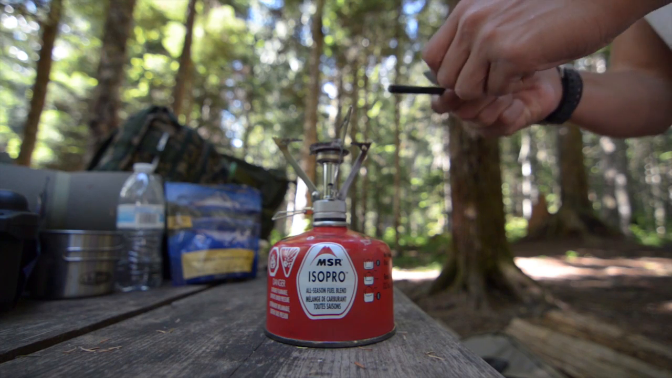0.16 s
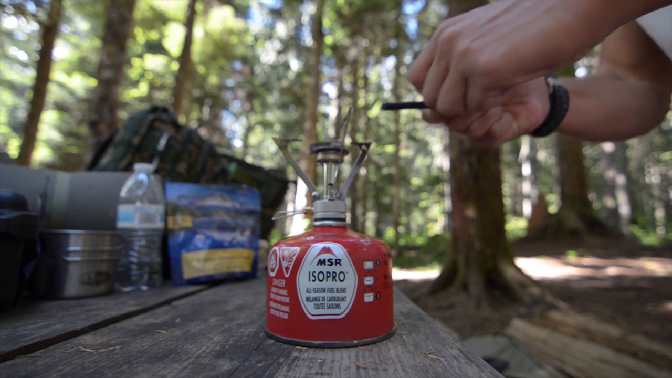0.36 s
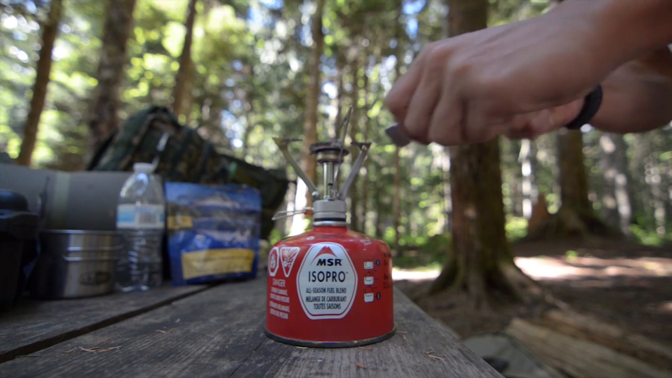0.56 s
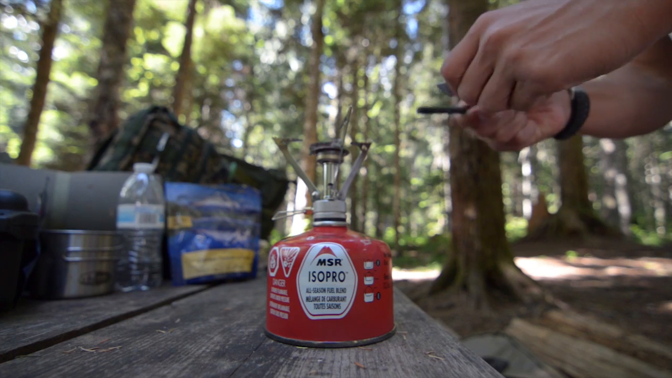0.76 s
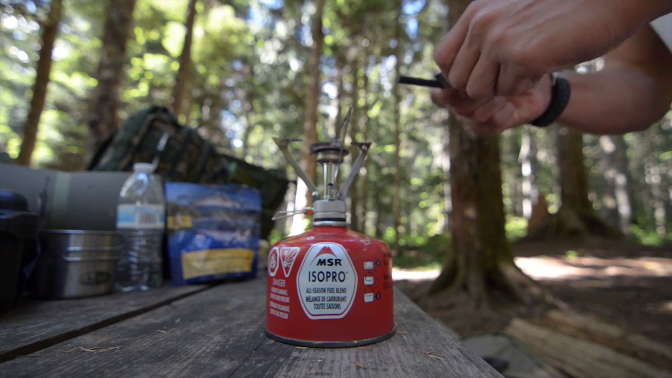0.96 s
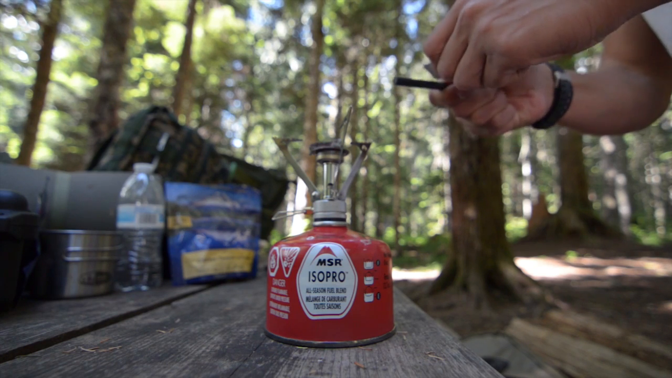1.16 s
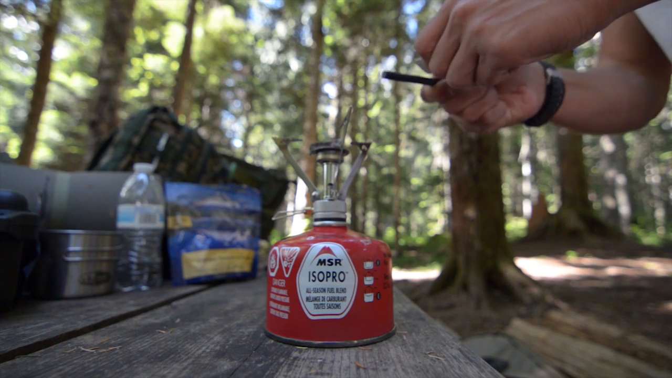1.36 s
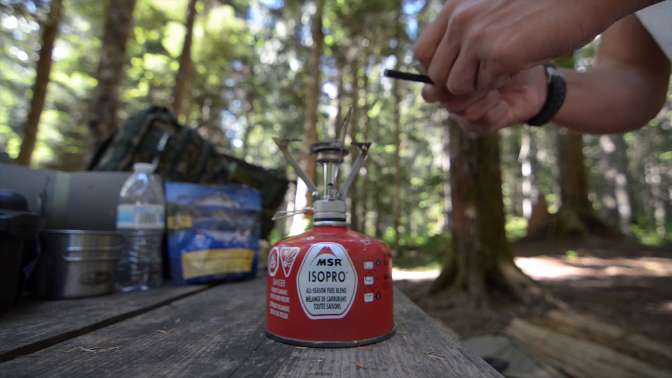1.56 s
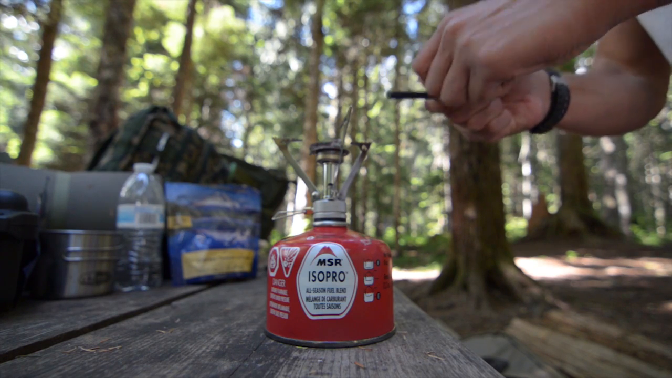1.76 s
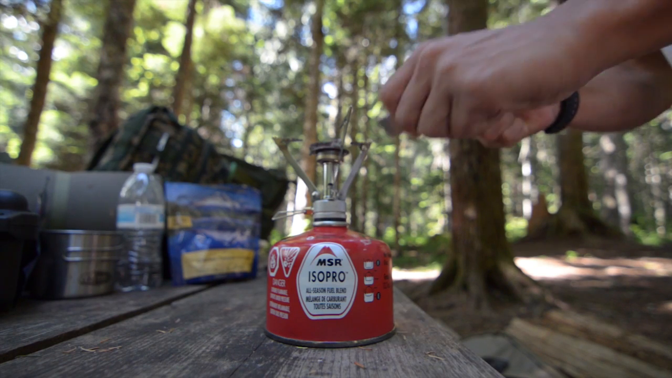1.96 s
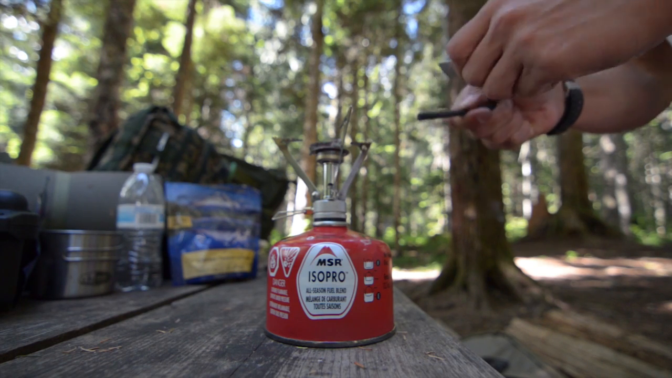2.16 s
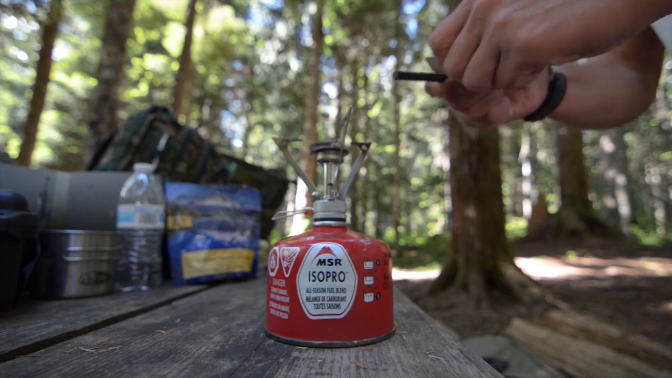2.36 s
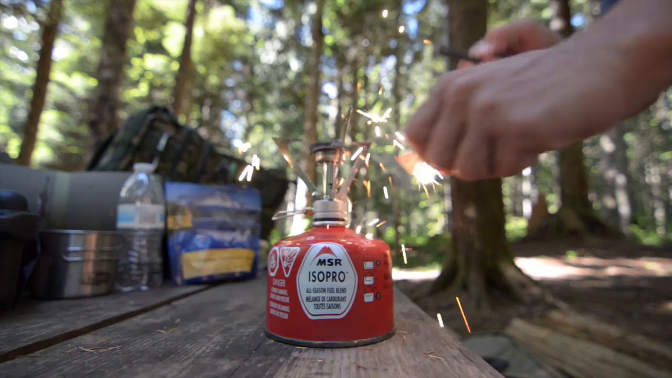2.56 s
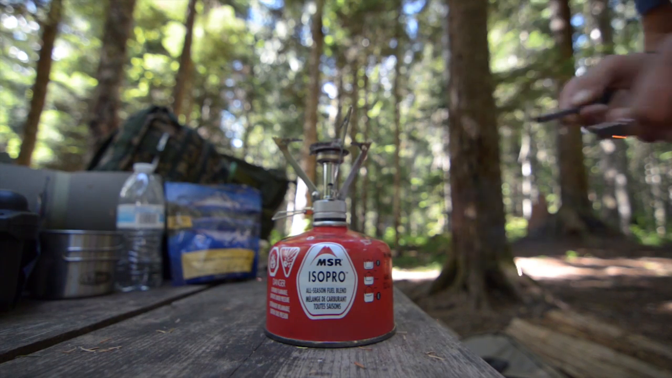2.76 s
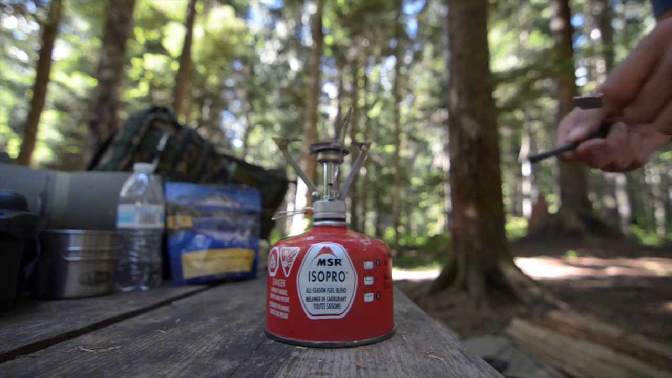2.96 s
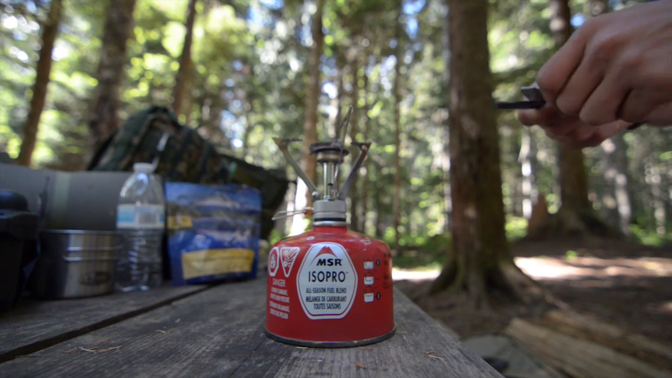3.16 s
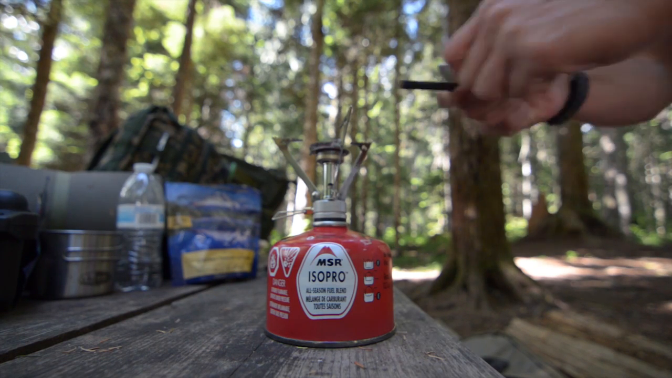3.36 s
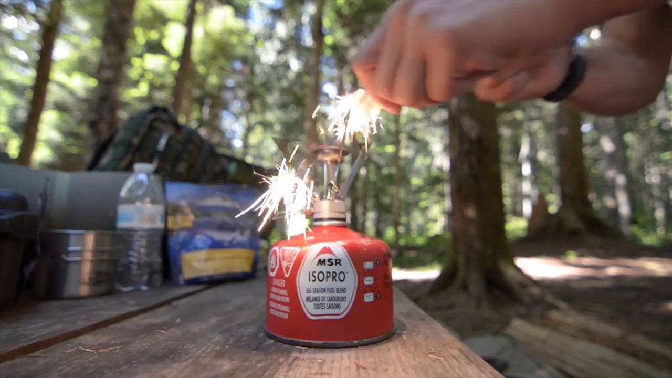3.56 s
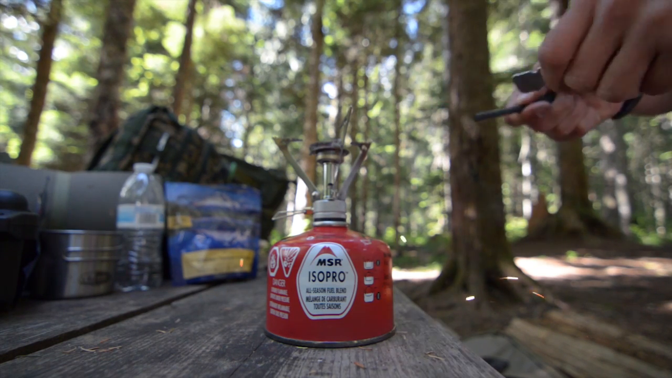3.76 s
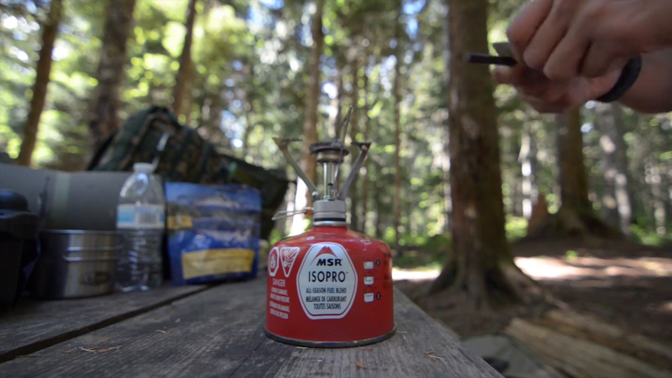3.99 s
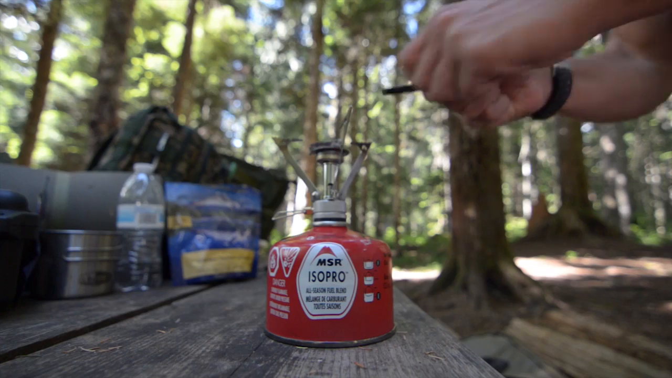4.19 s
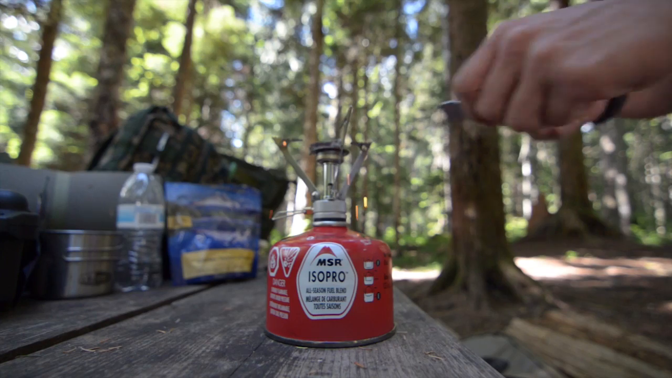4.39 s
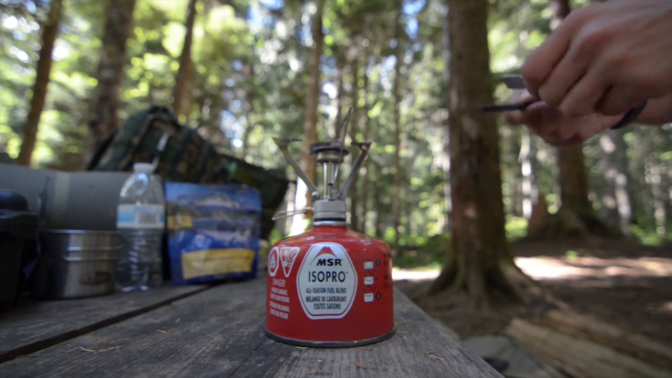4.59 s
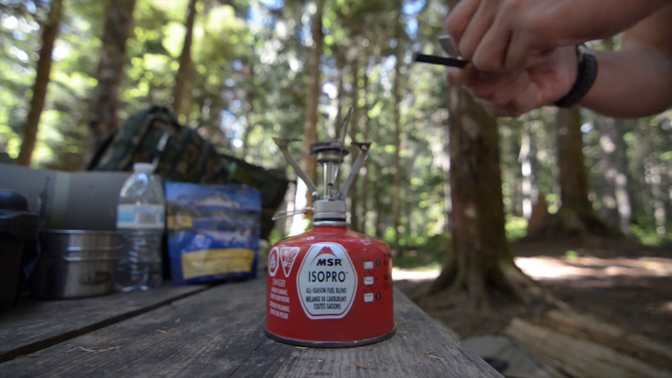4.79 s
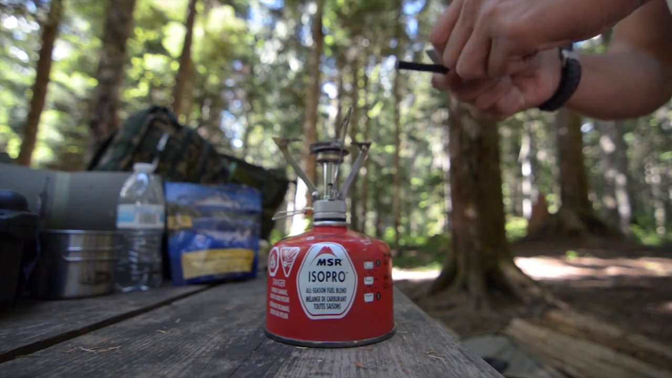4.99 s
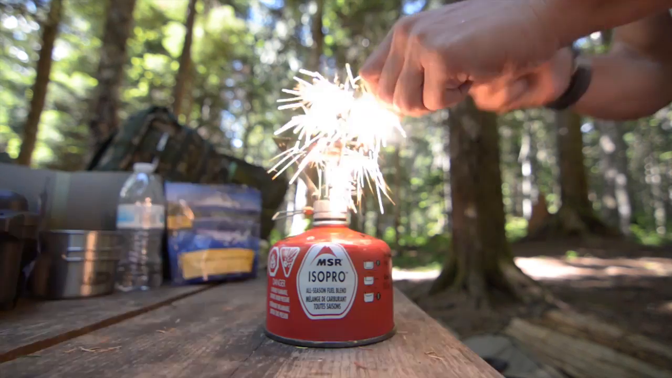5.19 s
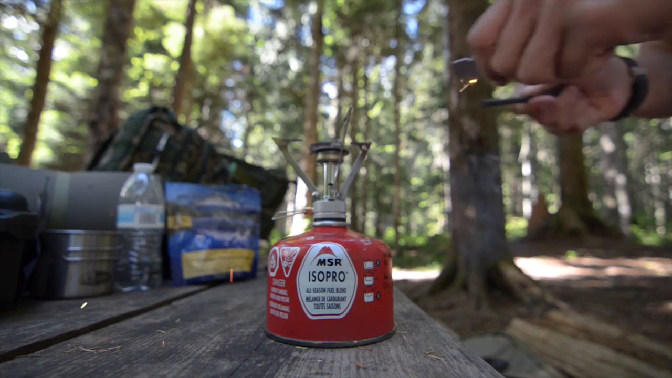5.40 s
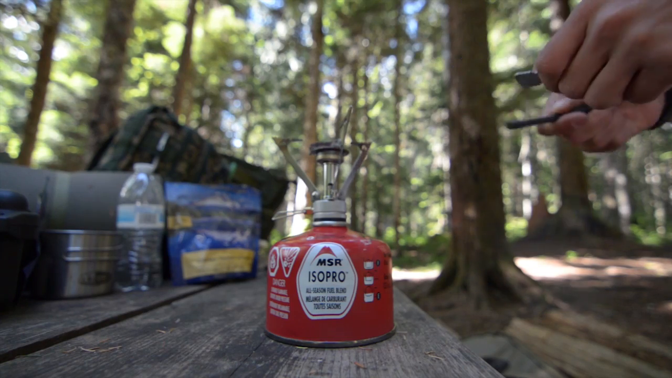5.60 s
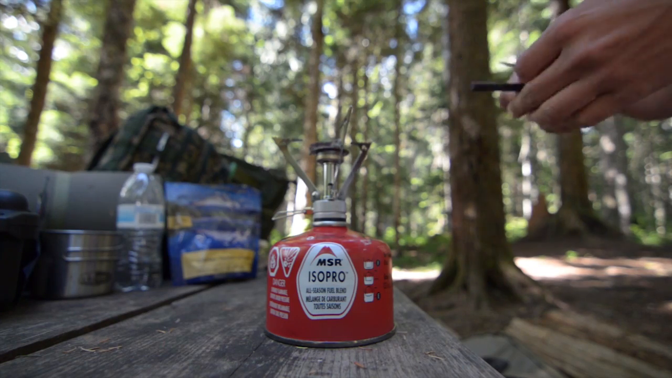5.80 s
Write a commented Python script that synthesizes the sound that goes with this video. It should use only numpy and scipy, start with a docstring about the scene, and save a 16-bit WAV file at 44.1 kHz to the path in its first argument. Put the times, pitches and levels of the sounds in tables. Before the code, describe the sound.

A nearly six-second close outdoor take of a steel striker on a fire-starting rod. Brief bright rubs open it, with a faint click at 0.15. At about 0.46 a short rasp ends in a hard double clack at 0.5, with barely any crackle. Dull rubs and a light clack follow around 0.86 to 1.04. A weaker scrape comes at 1.85, with a sharp tick and a small fizz at 1.93. After a clack at 2.33, the stroke at 2.48 erupts at 2.55 into loud dense crackle and pops, spluttering until 2.7. Further gritty strokes at 3.51 and 4.25 snap and flare, the former trailing tiny pops to 3.73. The last, at 5.2, bursts loudly at 5.26, then leaves small bright ticks until 5.45. A soft, steady hush of trees lies beneath, with low wind bumps, strongest around 5 seconds. The sound is dry, with only very faint scatter from trunks.

```python
"""A steel striker is drawn along a ferrocerium rod six times, over a camping stove in a forest.
Each stroke is scraping grit that rings the steel; the slips and landings are clacks of chatter and damped modes.
The shavings burn as clouds of random impulses, the largest popping singly; light rubs and ticks fill the gaps.
Filtered noise makes the hush of the trees and the gusts buffeting the microphone."""
import sys
import numpy as np
from scipy import signal
from scipy.fft import rfft, irfft, next_fast_len
from scipy.io import wavfile
from scipy.ndimage import map_coordinates

SR = 44100
rng = np.random.default_rng(int(sys.argv[2]) if len(sys.argv) > 2 else 0)


def to_wav(sig):
    """Store sig (one row per channel, or 1-D mono) as 16-bit WAV at the path in sys.argv[1].

    Samples outside -1..1 are clipped; the rate is SR.
    """
    pcm = np.clip(np.atleast_2d(sig), -1, 1) * 32767
    pcm = np.round(pcm).astype(np.int16)
    wavfile.write(sys.argv[1], SR, pcm.T)  # frames by channels


N = 257544  # length in samples


def amp(db):
    """Decibels to gain."""
    return 10 ** (np.asarray(db) / 20)


def unit(x):
    """Scale to rms 1."""
    return x / np.sqrt(np.mean(x ** 2) + 1e-20)


def gain(points, hz):
    """Gain of (Hz, dB) points on a log frequency axis."""
    f, db = np.transpose(points)
    return amp(np.interp(np.log(hz + 1), np.log(f), db))


def curve(rows):
    """One value per sample from (s, value) rows."""
    s, value = np.transpose(rows)
    return np.interp(np.arange(N) / SR, s, value)


def wobble(rate):
    """A smooth random curve, rate knots a second."""
    knots = rng.standard_normal(int(N * rate / SR) + 4)
    return map_coordinates(knots, [np.arange(N) * rate / SR])


def resonance(f, hz, width):
    """Complex response of one damped mode."""
    return 1j * f * width / (hz * hz - f * f + 1j * f * width)


def coloured(x, magnitude):
    """Causal (minimum-phase) filter with the given gain at each frequency."""
    size = 4096
    log_gain = np.log(np.maximum(magnitude(np.fft.rfftfreq(size, 1 / SR)), 1e-6))
    cepstrum = irfft(log_gain)
    cepstrum[1:size // 2] *= 2
    cepstrum[size // 2 + 1:] = 0
    impulse_response = irfft(np.exp(rfft(cepstrum)))
    return signal.fftconvolve(x, impulse_response)[:len(x)]


def grains(rate, spread_db):
    """Tiny random impulses of uneven size, rate a second, rms 1."""
    chance, size, sign = rng.random(N), rng.standard_normal(N), rng.choice([-1, 1], N)
    return unit((chance < rate / SR) * sign * amp(spread_db * np.clip(size, -2, 2)))


def add(track, s, sound):
    """Mix a sound into the track at time s."""
    start = max(round(s * SR), 0)
    part = track[start:start + len(sound)]
    part += sound[:len(part)]


def bells(rows):
    """Bell-shaped swells, added in power, from (s, length s, dB) rows."""
    t = np.arange(N) / SR
    return np.sqrt(sum(amp(db) ** 2 * np.exp(-(2 * (t - s) / length) ** 2) for s, length, db in rows))


def sliding(s, length, knots_s, levels_db, rise, fall):
    """Envelope of one sliding contact, its level passing through the given knots."""
    t = np.arange(N) / SR - s
    gate = np.clip(t / rise, 0, 1) * np.exp(-np.maximum(t - length, 0) / fall)
    return gate * amp(np.interp(t, knots_s, levels_db))


def snaps(rows, spectrum, tail, t60):
    """Sharp little impulses with a short splutter, peak dB for each row."""
    out, t = np.zeros(N), np.arange(SR // 30) / SR
    for s, db in rows:
        splutter = tail * rng.standard_normal(len(t)) * amp(-60 * t / t60)
        snap = coloured((t == 0) + splutter, spectrum)
        add(out, s, amp(db) * snap / abs(snap).max())
    return out


# Gusts reaching the microphone. Each row: height of the gust in seconds, length in seconds, level in dB.
GUSTS = [(0.5, 0.16, -46), (0.817, 0.045, -44.5), (1.124, 0.1, -45.5), (1.263, 0.048, -37.5),
         (1.562, 0.2, -42), (1.803, 0.055, -40), (2.188, 0.04, -48.5), (2.563, 0.22, -45.5),
         (2.84, 0.09, -45.5), (3.138, 0.074, -43.5), (4.041, 0.056, -42.5), (4.495, 0.057, -43.5),
         (4.653, 0.08, -44.5), (4.97, 0.21, -35), (5.188, 0.11, -37.5), (5.415, 0.24, -40.5)]
# The light air between gusts. Each row: time in seconds, level in dB.
LIGHT_AIR = [(0, -52.5), (1.9, -57.5), (3.4, -60.5), (4.2, -63.5), (5.84, -59)]
DRIFT_SWING_DB, DRIFT_RATE = 3.5, 10  # typical random swing, knots a second


def wind_strength():
    """Light air wanders; the gusts swell and sink on top of it, added in power."""
    light_air = amp(curve(LIGHT_AIR) + DRIFT_SWING_DB * wobble(DRIFT_RATE))
    return np.hypot(bells(GUSTS), light_air)


# Hush of the trees. Each row: frequency in Hz, relative density in dB per Hz.
FOREST_SPECTRUM = [(60, -7.5), (400, 0), (800, 1.5), (1800, -3), (2600, -5.5), (3400, -3.5), (4200, -1),
                   (5000, -7), (7500, -9.5), (10500, -21), (12000, -29.5), (16000, -34)]
# Rumble of air on the microphone. Each row: frequency in Hz, relative density in dB per Hz.
RUMBLE_SPECTRUM = [(20, -7), (45, 3), (80, 2.5), (130, -0.5), (200, -9.5), (320, -18), (700, -42),
                   (2000, -93.5)]
# Single eddies hitting the microphone. Each row: start in seconds, peak in dB.
EDDIES = [(4.987, -26), (5.024, -27.5), (5.188, -21.5), (5.347, -25.5)]


def breeze():
    """An almost steady hush in the trees, lumpy turbulence on the microphone and a few single eddies."""
    trees = unit(coloured(rng.standard_normal(N), lambda f: gain(FOREST_SPECTRUM, f)))
    rumble = coloured(rng.standard_normal(N), lambda f: gain(RUMBLE_SPECTRUM, f))
    air = unit(rumble * amp(2.9 * wobble(25)))
    out = amp(-49.0 + 0.37 * wobble(4.09)) * trees + wind_strength() * air
    u = np.arange(SR // 20) / SR / 0.0014
    for s, db in EDDIES:
        eddy = u * (2 - u) * np.exp(-u)  # one push and its suction
        add(out, s, amp(db) * eddy / eddy.max())
    return out


# Light sliding of steel on the rod. Each row: start in seconds, length in seconds, level in dB,
# brightness in dB (3 dB is taken off it when played).
RUBS = [(0, 0.037, -39, 15.5), (0.053, 0.016, -42, 9), (0.886, 0.034, -48.5, 1), (0.948, 0.03, -41.5, 0),
        (1.023, 0.017, -38.5, -4), (3.189, 0.016, -42.5, -3.5), (3.494, 0.013, -43.5, 1),
        (4.232, 0.0082, -40, 6), (5.05, 0.008, -42, 8), (5.383, 0.019, -42, 0)]
# Colour of bare steel contact, for rubs and clacks. Each row: frequency in Hz, relative density in dB per Hz.
CRACK_SPECTRUM = [(100, -29), (600, -8.5), (1300, -2), (3000, 4), (5000, 5.5), (8000, 3.5), (10500, -4.5),
                  (12500, -7), (16000, -8)]
# Treble shaping of rubs, clacks and rasp. Each row: frequency in Hz, gain in dB.
ROLL_OFF = [(9500, 3), (11500, -4.5), (13500, -7), (16000, -29)]


def rubs():
    """The striker slides lightly into place: dull on its flat, bright on its edge."""
    out = np.zeros(N)
    friction = grains(rate=12000, spread_db=3)
    for s, length, db, bright_db in RUBS:
        def tone(f):
            brightness = gain([(4500, 0), (7000, bright_db - 3.0)], f)
            ring = abs(1 + 1.9 * resonance(f, 1490, 350))
            return gain(CRACK_SPECTRUM, f) * gain(ROLL_OFF, f) * brightness * ring

        contact = sliding(s, length, [0], [db], rise=0.0013, fall=0.0039)
        out += contact * unit(coloured(friction, tone))
    return out


# Rod and striker, damped by the fingers. Each row: mode in Hz, relative level in dB, t60 in seconds
# (every clack detunes the modes and shifts their levels a little).
STEEL_MODES = [(3820, 2, 0.0091), (4630, 12, 0.0045), (6010, 1.5, 0.022), (7690, 16.5, 0.0068),
               (8950, 4.5, 0.0062)]
OVERTONE, OVERTONE_DB = 1.99, -13.5  # second bending mode of the rod, relative to the first


def clack(ring_hz, ring_db, treble_db):
    """One contact: a hard snap and chatter, brief steel modes and the low bending modes of the held rod."""
    t = np.arange(SR // 20) / SR
    chatter = rng.choice([-1., 1.], len(t)) * (amp(-60 * t / 0.016) + 0.92 * amp(-60 * t / 0.0026))
    crack = unit(coloured(chatter, lambda f: gain(CRACK_SPECTRUM, f)))
    modes = np.zeros(len(t))
    for hz, db, t60 in STEEL_MODES:
        decay = amp(db + rng.normal(0, 2.4) - 60 * t / t60)
        modes += decay * np.sin(2 * np.pi * hz * rng.normal(1, 0.02) * t)
    tilt = lambda f: gain([(4500, 0), (7000, treble_db)], f) * gain(ROLL_OFF, f)
    bright = unit(coloured(crack + amp(-7.5) * unit(modes), tilt))
    swing = np.sin(2 * np.pi * ring_hz * t) + amp(OVERTONE_DB) * np.sin(2 * np.pi * OVERTONE * ring_hz * t)
    bend = unit(swing * amp(-60 * t / 0.011) * (1 - np.exp(-t / 0.00089)))
    share = min(float(amp(ring_db - 0.5)), .9)
    sound = np.sqrt(1 - share ** 2) * bright + share * bend
    return sound / np.sqrt(np.sum(sound ** 2) / (SR / 200))  # as much energy as 5 ms at rms 1


# The striker slips off or lands on the rod. Each row: start in seconds, level in dB, ring in Hz,
# ring share in dB (0.5 dB is taken off, and the share is capped at 0.9), treble tilt in dB,
# thud of the hand in dB relative to the level.
CLACKS = [(0.153, -30.5, 1700, -35, -3, -28), (0.2964, -32, 1700, -15, -1.5, -22),
          (0.4585, -27, 1720, -9, -2, -8), (0.497, -10, 1970, -11, -0.2, -28),
          (0.521, -17, 1640, -0.1, 1.5, -20.5), (0.8575, -27, 1634, -6.5, -4.5, -27),
          (1.5977, -34, 1600, -11, -3.5, -20), (1.9232, -20, 1640, -4, -1.5, -19),
          (2.3284, -19.5, 1874, -5.5, 1, -42), (2.534, -6.5, 1650, -7, 8.5, -19),
          (3.5655, -11, 1640, -6, 7, -26), (4.0274, -30.5, 1570, -1.5, -3.5, -18),
          (4.3028, -9, 1560, -9.5, 4, -26), (5.2483, -9, 1585, -5.5, 6, -28)]
THUD_HZ, THUD_T60_S = 300, 0.017  # the fist around the rod takes the blow


def clacks():
    """Every hard contact of striker and rod, with its dull thud in the hand."""
    out, t = np.zeros(N), np.arange(SR // 20) / SR
    thud = np.sin(2 * np.pi * THUD_HZ * t) * amp(-60 * t / THUD_T60_S)
    thud /= np.sqrt(np.sum(thud ** 2) / (SR / 200))  # same energy as a clack
    for s, db, ring_hz, ring_db, treble_db, thud_db in CLACKS:
        add(out, s, amp(db) * (clack(ring_hz, ring_db, treble_db) + amp(thud_db) * thud))
    return out


# Strokes of the edge along the rod. Each row: first touch in seconds, draw until it slips in seconds,
# run-out after the slip in seconds, level in dB, first touch in dB relative to that level.
STROKES = [(0.461, 0.033, 0.03, -23, -11), (1.854, 0.06, 0.016, -23, -13.5), (2.482, 0.05, 0.11, -24, -11),
           (3.511, 0.045, 0.06, -22, -5.5), (4.25, 0.044, 0.014, -23, -7),
           (5.199, 0.058, 0.026, -20.5, -14.5)]
# Soft resonances of the rod and the hand around it. Each row: centre in Hz, width in Hz, level in dB.
GRIP = [(270, 190, -3.5), (970, 700, -10.5), (1665, 290, 7.5)]
GROAN_DB, GROAN_SWELL_DB = -39, 9  # full level, and how far below it the groan starts
GROAN_LEAD_S = 0.027  # head start on the first touch


def groan():
    """Pressed by the striker, the held rod starts to judder before the edge bites, and goes on until it slips."""
    levels = [GROAN_DB - GROAN_SWELL_DB, GROAN_DB]
    knots = [0, GROAN_LEAD_S + 0.006]
    pressure = sum(sliding(s - GROAN_LEAD_S, draw + GROAN_LEAD_S, knots, levels, rise=0.014, fall=0.0057)
                   for s, draw, *_ in STROKES)
    body = lambda f: sum(amp(db) * abs(resonance(f, hz, width)) ** 2 for hz, width, db in GRIP)
    judder = rng.standard_normal(N) * amp(2.4 * wobble(180))
    return pressure * unit(coloured(judder, body))


BITE_S = 0.022  # from first touch to full bite
# force relative to the stroke's level: once the edge has bitten, after the slip, at lift-off
BITE_DB, SLIP_DB, LIFT_DB = -1.5, -4.5, -11.5


def stroke_force(s, draw, run_out, touch_db):
    """The edge touches, bites, presses harder until it slips, and runs out along the rod."""
    knots = [0, BITE_S, draw, draw + 0.002, draw + 0.002 + run_out]
    levels = [touch_db, BITE_DB, 0, SLIP_DB, LIFT_DB]
    return sliding(s, draw + run_out, knots, levels, rise=0.002, fall=0.0028)


# Resonances driven by the scraping edge. Each row: centre in Hz, width in Hz, level in dB.
RASP_MODES = [(4680, 910, -8), (6700, 700, -5), (7640, 1000, 5.5), (8600, 650, -12)]
# Colour of the torn chips. Each row: frequency in Hz, relative density in dB per Hz.
GRIT_SPECTRUM = [(100, -24), (400, -20.5), (1200, -12.5), (2800, -34), (5000, -20), (9000, -27),
                 (16000, -21)]


def rasp():
    """The edge tears thousands of chips a second off the rod, and each one rings the steel."""
    force = sum(amp(db) * stroke_force(s, draw, run_out, touch_db) for s, draw, run_out, db, touch_db in STROKES)
    steel = lambda f: sum(abs(amp(db) * resonance(f, hz, width)) ** 2 for hz, width, db in RASP_MODES)
    body = lambda f: np.sqrt(gain(GRIT_SPECTRUM, f) ** 2 + steel(f)) * gain(ROLL_OFF, f)
    chips = grains(rate=20000, spread_db=3)
    catching = amp(2.8 * wobble(260))  # the edge catches and frees itself
    return force * unit(coloured(chips * catching, body))


CATCH_DB, BURN_DB = 29, 9  # a cloud swells by this much as it catches and sinks by this much as it burns
DIE_DB_PER_S = 858  # then it goes out


def flare(s, catch, burn):
    """Envelope of one cloud of shavings: it catches ever more slowly, burns down and goes out."""
    t = np.arange(N) / SR - s
    catching = CATCH_DB * np.clip(-t / catch, 0, 10) ** 2
    burning = BURN_DB * np.clip(t / burn, 0, 1)
    dying = DIE_DB_PER_S * np.maximum(t - burn, 0)
    return amp(-catching - burning - dying)


# Clouds of shavings catching fire. Each row: brightest moment in seconds, level in dB,
# time to catch in seconds, time to burn in seconds.
FLARES = [(0.518, -30.5, 0.014, 0.0061), (1.933, -25, 0.028, 0.017), (2.545, -14.5, 0.045, 0.045),
          (2.625, -28, 0.037, 0.036), (2.687, -32.5, 0.046, 0.004), (3.589, -17, 0.033, 0.062),
          (4.335, -19.5, 0.049, 0.021), (5.259, -14, 0.053, 0.031)]
# Colour of the burning shavings. Each row: frequency in Hz, relative density in dB per Hz.
FLARE_SPECTRUM = [(60, -25), (200, -6), (550, -4), (800, 2), (1000, 0.5), (1200, 3), (1500, -4.5),
                  (3800, -3), (5100, -0.5), (6300, -2.5), (8500, -4), (11000, -12), (15000, -29.5)]
# Single sparks and crumbs snapping. Each row: start in seconds, peak in dB.
POPS = [(2.576, -2), (2.6331, -11), (2.6608, -15), (2.7028, -18.5), (3.6542, -10), (3.672, -12),
        (3.689, -20.5), (3.7033, -18), (3.7181, -26), (3.7292, -20.5), (4.3597, -7.5), (5.2595, -2),
        (5.3362, -15), (5.3381, -13.5)]


def sparks():
    """Shavings ignite in a dense crackle; a few large ones burst singly."""
    fire = sum(amp(db) * flare(s, catch, burn) for s, db, catch, burn in FLARES)
    bursts = grains(rate=11000, spread_db=4) * amp(1.9 * wobble(200))
    blaze = fire * unit(coloured(bursts, lambda f: gain(FLARE_SPECTRUM, f)))
    pop_colour = lambda f: gain(FLARE_SPECTRUM, f) * gain([(1000, 1), (8000, -0.63)], f)
    return blaze + snaps(POPS, pop_colour, tail=0.13, t60=0.015)


# Faint hollow swells in the hush. Each row: height of the swell in seconds, length in seconds, level in dB.
SWELLS = [(0.75, 0.12, -52.5), (3.0, 0.1, -52.5)]
SWELL_HZ, SWELL_WIDTH_HZ = 610, 310


def swells():
    """Twice the hush briefly turns hollow: noise through one broad resonance."""
    hollow = lambda f: abs(resonance(f, SWELL_HZ, SWELL_WIDTH_HZ)) ** 2
    return bells(SWELLS) * unit(coloured(rng.standard_normal(N), hollow))


# Brief bright catches of the steel edge. Each row: start in seconds, peak in dB.
TICKS = [(1.875, -15.5), (2.7475, -30.5), (5.3877, -27), (5.3926, -33), (5.4014, -25.5), (5.4355, -38),
         (5.4514, -36)]


def ticks():
    """The edge barely touches the rod: mostly treble."""
    treble = lambda f: gain([(2000, -12), (5500, -12), (7500, 5), (10000, -4), (15000, -21)], f)
    return snaps(TICKS, treble, tail=0.23, t60=.013)


# Reflections off the stove and the table top. Each row: delay in seconds, level in dB
# (the wet level leaves these alone).
WALLS = [(.0027, -23.5), (.0042, -46), (.0053, -18.5), (.0068, -31.5)]


def trunks(x, t60, wet_db):
    """Weak reflections off nearby things, and faint scatter from the tree trunks as decaying noise."""
    t = np.arange(SR // 2) / SR
    tail = rng.standard_normal(len(t)) * amp(-60 * t / t60) * (t > .003)
    echoes = amp(wet_db) * tail / np.linalg.norm(tail)
    for delay, db in WALLS:
        add(echoes, delay, amp([db]))
    return signal.fftconvolve(x, echoes)[:N]


def scene():
    """The fire steel close by, in the open forest."""
    steel = rasp() + groan() + rubs() + clacks() + ticks() + sparks()
    return (steel + trunks(steel, t60=0.81, wet_db=-31.5) + breeze() + swells())[None]


# Narrow dips of the microphone housing. Each row: centre in Hz, width in Hz, depth from 0 to 1.
PORT = [(2920, 78, 0.75), (3480, 160, 0.56), (4210, 130, 0.36), (5670, 620, 0.8), (6940, 90, 0.8)]


def housing(f):
    """Cavities in front of the microphone swallow narrow bands."""
    return np.prod([1 - depth * resonance(f, hz, width) for hz, width, depth in PORT], axis=0)


TOP_HZ, FULL_SCALE = 15900, 0.92  # band limit, clipping level


def record(dry):
    """Microphone colour, clipping at full scale and the band limit."""
    size = next_fast_len(N + SR // 4)
    f = np.fft.rfftfreq(size, 1 / SR)
    heard = irfft(rfft(dry, size) * housing(f), size)
    clipped = np.clip(heard, -FULL_SCALE, FULL_SCALE)
    return irfft(rfft(clipped) * (f < TOP_HZ), size)[..., :N]


dry = scene()
out = record(dry)
to_wav(out)
```